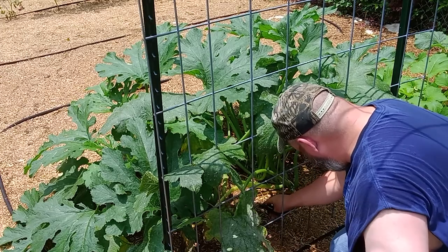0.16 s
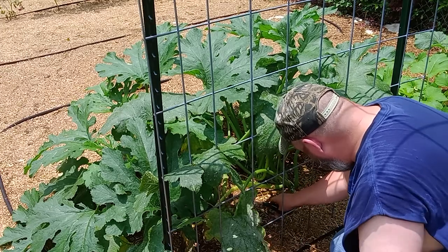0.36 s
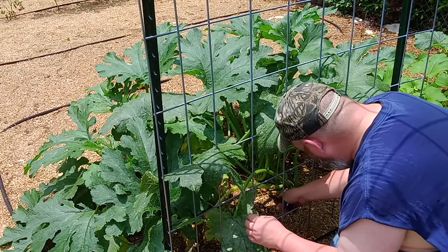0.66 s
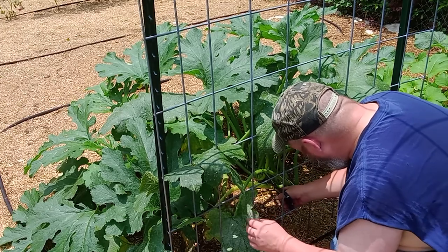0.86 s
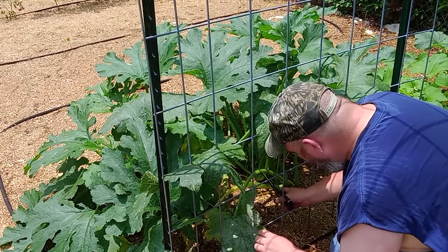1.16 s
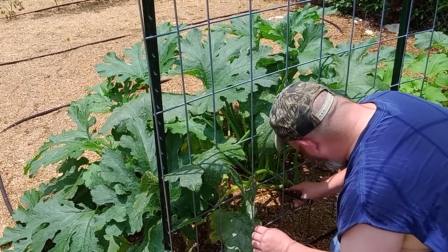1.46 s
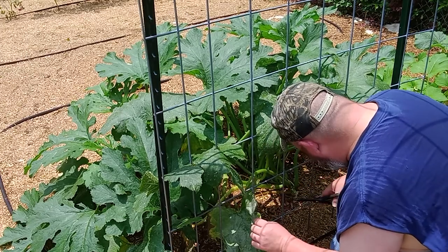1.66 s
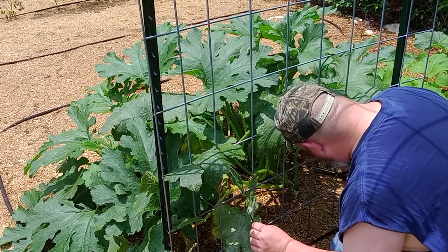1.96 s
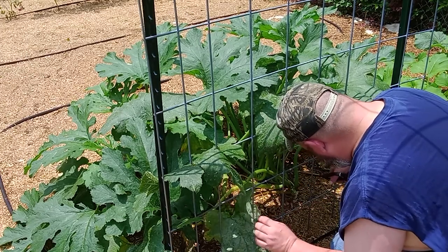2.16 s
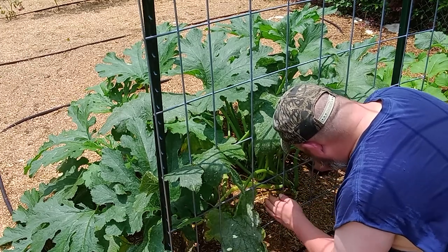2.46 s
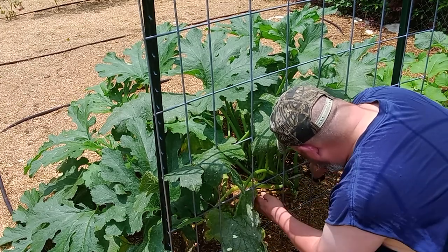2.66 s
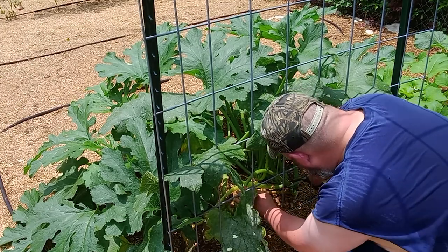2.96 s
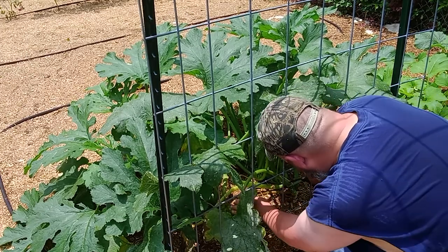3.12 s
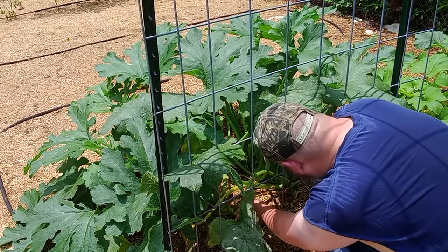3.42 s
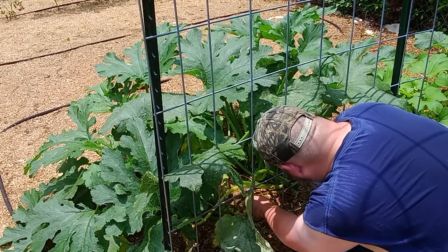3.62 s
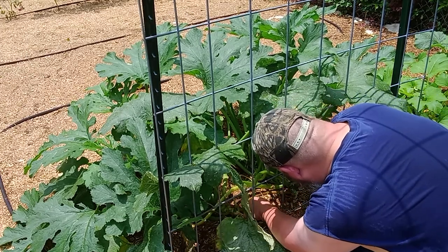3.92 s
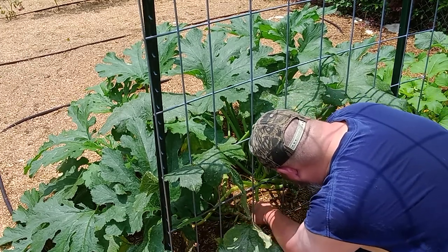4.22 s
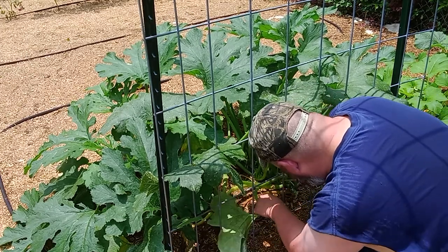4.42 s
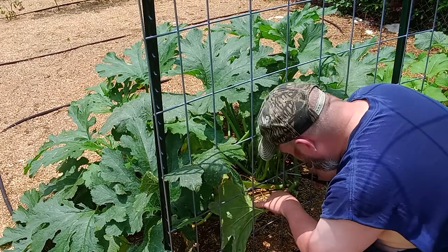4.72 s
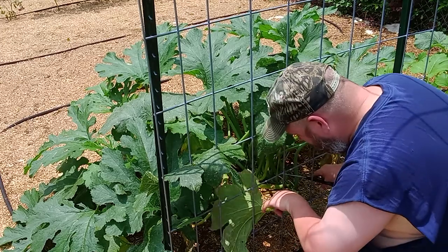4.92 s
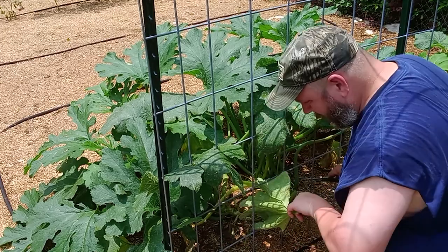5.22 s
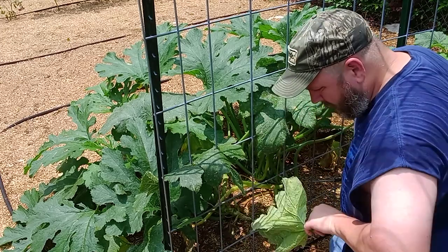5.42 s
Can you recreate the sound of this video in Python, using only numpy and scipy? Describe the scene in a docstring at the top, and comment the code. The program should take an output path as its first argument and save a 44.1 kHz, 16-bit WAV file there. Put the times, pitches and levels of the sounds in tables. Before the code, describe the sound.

Close outdoor stereo pickup in a garden with slight wind on the microphone. Leaves rustle and blades nip softly at first, then shear hard around 1.6 seconds. A cicada pulses in a raspy buzz that dies out by about 3.5 seconds. Small birds twitter and whistle. A hollow stalk cracks at 4.4 seconds, then a bristly leaf is dragged out, over constant low traffic and machine hum.

```python
"""First a hand stirs a squash plant and the blades nip, over a cicada that pulses until it runs down, while a gust fades.
At 1.6 s the hand pruners shear hard; small birds twitter at 2.1 s and 3.6 s, and others whistle from 3.8 s on.
At 4.4 s a hollow stalk cracks, and around 5 s the bristly leaf is dragged out; far traffic and a machine hum throughout.
Cuts and leaves are tiny random snaps sent through resonances and colours; cicada, birds and hum are gliding tones.
Traffic, wind and air are shaped noise."""
import sys
import numpy as np
from scipy import signal
from scipy.fft import rfft, irfft, next_fast_len
from scipy.io import wavfile
from scipy.ndimage import uniform_filter1d

SR = 44100
rng = np.random.default_rng(int(sys.argv[2]) if len(sys.argv) > 2 else 0)


def transcribe(u):
    """Save the signal u as a 16-bit wav file named by the first command-line argument.

    u: samples, shape (n,) or (channels, n), limited to [-1, 1]; the rate is SR.
    q: integer samples, one column per channel.
    """
    v = np.clip(np.atleast_2d(u).T, -1, 1)
    q = np.round(v * 32767).astype(np.int16)
    wavfile.write(sys.argv[1], SR, q)


N = 246059
TIME = np.arange(N) / SR  # seconds

# Levels in the tables are relative: later mixing steps may shift them.
# Blades biting and stalks giving way. Each row: start in seconds, level in dB,
# fade time in seconds, ring of the hollow stalk in dB against the tearing.
CUTS = [(0.043, -72, 0.0061, 7), (0.174, -57, .003, 3), (0.214, -54.5, 0.019, -9), (.277, -62, .005, 12),
        (.319, -59.5, 0.008, 13), (1.569, -54, 0.021, -26), (1.6363, -42, 0.0033, -23),
        (1.641, -47, 0.0089, -32), (1.6535, -53, 0.005, -26), (1.6656, -51, 0.0076, -18),
        (1.682, -53.5, 0.012, -16), (2.165, -53.5, 0.0049, -16), (2.2902, -58, .003, -8),
        (3.019, -61, .004, -12), (3.3019, -61, .009, -8), (3.566, -59, .004, -13),
        (3.9405, -58, 0.0016, -12), (3.9925, -67, .003, -4), (4.0745, -61, 0.015, 6),
        (4.1155, -43, 0.0033, -8), (4.1188, -56, .001, -5), (4.1199, -52, 0.002, -11),
        (4.2138, -62, .003, -8), (4.3637, -51.5, 0.003, 6), (4.379, -42.5, 0.0007, 7.5),
        (4.3806, -42, .0027, 6.5), (4.3862, -46, .001, -3), (4.8, -57, 0.0033, -5), (4.825, -65, 0.0036, 2),
        (4.8663, -77, 0.0036, -10), (5.3433, -62, 0.0025, -14)]
# Resonances of the hollow stalk. Each row: pitch in Hz, width in Hz, level in dB.
STALK_MODES = [(960, 230, 9.5), (1760, 110, 8), (1900, 180, 3), (2550, 160, -18), (3270, 130, 2),
               (4300, 290, 11), (5200, 250, 10), (6240, 330, -7), (10800, 480, -2), (13000, 400, -3)]
# The stem jolts as it is cut. Each row: pitch in Hz, width in Hz, level in dB.
JOLT_MODES = [(337, 58, 11), (524, 190, 4), (714, 47, -5)]
# Bright resonances that ring with each cut. Each row: pitch in Hz, width in Hz, level in dB.
BRIGHT_MODES = [(5570, 140, -14), (7760, 240, 7), (9500, 220, 2), (13500, 490, -1)]
# Colour of tearing fibres. Each row: frequency in Hz, level in dB.
TEARING_COLOUR = [(500, 7), (1500, -8), (3000, 2.5), (4200, -0.5), (6000, 7.5), (8500, -1.5), (11000, -3),
                  (13500, -6), (16000, -6)]
TEAR_SHARE = 0.99  # fibres tear at full strength for this share of the fade time
SNAP_ONSET_DB, KNOCK_DB = 16, 24  # first crack of a cut, and its knock on the stalk, above the tearing
CUT_PAN_DB = 1  # louder on the left
REFLECTION_S, REFLECTION_DB = .019, -14  # a nearby surface throws each cut back
ECHO_TOP_HZ = 6000  # foliage soaks up the treble of the echoes

# A hand moves through the plant. Each row: time of the height in seconds, rise time in seconds,
# level of bristles in dB, of bending leaf in dB, of rubbing stalks in dB.
STROKES = [(0.063, 0.055, -52.5, -52, -72), (.3, 0.24, -68, -57, -74), (1.665, 0.05, -56, -57, -49),
           (1.72, 0.42, -60.5, -63.5, -71), (1.93, 0.026, -57, -75, -72), (2.22, 0.29, -58, -60.5, -72),
           (3.05, 0.38, -65.5, -68, -65), (3.35, 0.072, -61.5, -61, -66), (3.68, 0.12, -59.5, -67, -58),
           (4.1, 0.21, -54, -65, -57.5), (4.405, 0.039, -63, -53.5, -52), (4.62, 0.27, -71, -61, -62),
           (4.8, 0.12, -58, -57, -57.5), (4.95, 0.047, -54.5, -55, -51), (5.03, 0.13, -51.5, -64, -55),
           (5.11, 0.051, -59, -53.5, -54), (5.19, 0.19, -47.5, -61, -72), (5.52, 0.38, -68, -65, -62.5)]
# Colour of scratching bristles. Each row: frequency in Hz, level in dB.
LEAF_COLOUR = [(400, -37), (1000, 1.5), (2700, -0.5), (4500, 0), (6300, -5.5), (7600, 4.5), (8800, -1.5),
               (11500, 0.5), (15500, -2)]
# A leaf flaps, or ticks against its neighbours. Each row: start in seconds, pitch in Hz, level in dB.
TAPS = [(3.243, 11500, -57), (3.346, 9250, -58), (3.368, 10000, -61), (3.43, 13000, -57),
        (4.829, 1900, -58), (5.087, 900, -44), (5.108, 1700, -47), (5.117, 1300, -46), (5.146, 900, -44),
        (5.17, 1000, -45), (5.186, 10000, -48), (5.218, 11500, -47), (5.266, 1200, -50), (5.445, 5000, -47),
        (5.488, 9000, -47.5), (5.55, 8500, -54), (5.567, 9000, -60)]
TAP_FADE_S, TAP_WIDTH = .003, 0.41  # how fast a tap dies; its bandwidth as a share of its pitch
FALL_SHARE = 0.77  # a stroke dies away in this share of its rise time
STIR_DB = -73.5  # the leaves never lie quite still
SNAPS_PER_S, SNAP_DB = 25, -11  # small fibres break at random; level against the bristles
BRISTLE_SURGE_DB, BRISTLE_PATCH_DB = 0.9, 2.0  # typical swing of the whole scratch, and of each band

# The cicada's count of pulses. Each row: time in seconds, pulses sung so far.
PULSES = [(-.021, 0), (.453, 6), (.993, 13), (1.658, 22), (2.526, 34), (2.906, 39), (3.388, 45), (5.58, 71)]
# The cicada's effort. Each row: time in seconds, level in dB.
EFFORT = [(0, -50.5), (1, -48.5), (2.1, -48), (2.45, -52.5), (2.7, -51.5), (2.88, -55), (3.38, -56.5),
          (3.5, -68), (3.8, -82), (5.58, -130)]
# One pulse of its abdomen. Each row: share of the cycle, depth of the pitch dip from 0 to 1, level in dB.
PULSE_SHAPE = [(0, .06, 4), (.14, .4, 5.5), (.3, .75, -1), (.52, 1, -2), (.72, .64, -1.5), (.86, .25, -9),
               (.93, 0, -1)]
# The dip gets shallower as the song goes on. Each row: time in seconds, lowest pitch in Hz before the waver.
DIP = [(0, 3860), (.6, 3990), (1.0, 4300), (2.1, 4466), (3.4, 4570)]
# Resonances that slide together in each pulse. Each row: multiple of the main pitch, level in dB.
SLIDING_MODES = [(.69, -14), (1, -3), (1.272, -17)]
# Fixed resonances of its body. Each row: pitch in Hz, width in Hz, level in dB.
BODY_MODES = [(3750, 40, -4), (3980, 40, -5), (4255, 40, -7), (4400, 60, -4), (4620, 50, -3),
              (5210, 45, -2), (5395, 30, -4), (5540, 25, -5), (5950, 50, -1), (6750, 90, -2)]
# Colour of the scattered song. Each row: frequency in Hz, level in dB.
HISS_COLOUR = [(2100, -36), (2800, -3.5), (3700, -0.5), (4500, 0), (5700, 3.5), (6700, -4.5), (7600, -7),
               (8400, -15), (10500, -17), (12700, -11), (15500, -28)]
# The scattered song, whose bright part leads each pulse. Each row: low edge in Hz, high edge in Hz,
# share of the cycle at its height, swing in dB at the start.
SCATTER_BANDS = [(1000, 4300, 0.47, 2.0), (4300, 5300, 0.17, 1), (5310, 20000, 0.13, 1)]
TOP_HZ = 6050  # the pitch where there is no dip, before the waver
TYMBAL_HZ, TYMBAL_WAVER, TYMBAL_RING_S = 372, .03, .0011  # mean buckling rate, typical waver as a share, ring
BUZZ_ROUGH = .45  # how much noise is mixed into the buzz
FLUTTER_PER_S, FLUTTER_DB = 110, 1.4  # the song breaks into uneven grains
CLARITY_LOSS = .5  # dB that the clear song sinks into the hiss per dB of lost effort
SONG_DB, SONG_ECHO_DB, SONG_HISS_DB = -5, -12, -3.8  # heard directly, echoed and scattered
SWING_GROWTH_PER_S = .22  # the gaps between pulses deepen as the song goes on

# A bird twitters twice, note by note. Each row: start in seconds, length in seconds, pitch in Hz,
# sweep in Hz, arch in Hz, level in dB.
TWITTERS = [(2.102, 0.019, 4000, -950, 298, -46), (2.127, 0.011, 3860, -1000, 250, -41),
            (2.143, 0.0077, 3930, -200, 0, -46), (2.161, 0.027, 3800, 250, 420, -43),
            (2.195, 0.015, 3590, -500, 0, -49), (3.567, .018, 3550, 1900, -450, -62),
            (3.589, .012, 4600, -600, 0, -61), (3.596, 0.019, 3950, -700, 100, -52.5),
            (3.615, 0.012, 3790, 700, 0, -51), (3.627, 0.012, 3760, 600, 0, -49),
            (3.636, 0.026, 3890, -200, 90, -53.5), (3.663, 0.011, 3590, 500, 0, -51),
            (3.677, 0.016, 3574, -300, 30, -51.5), (3.693, 0.017, 3590, -150, 0, -57),
            (3.732, .018, 3900, -150, 0, -69), (3.83, 0.0205, 3850, 400, 0, -67),
            (3.885, .024, 3820, -300, 0, -69), (3.99, .018, 3900, -150, 0, -64)]
# Other birds whistle single notes. Each row: start in seconds, length in seconds, pitch in Hz,
# sweep in Hz, level in dB.
WHISTLES = [(3.842, 0.045, 4564, -23, -50.5), (3.997, 0.04, 3175, -42, -61), (4.19, 0.14, 3860, -120, -67),
            (5.007, 0.072, 4570, -150, -50.5), (5.371, 0.068, 3760, -260, -62)]
TWITTER_PAN_DB, WHISTLE_PAN_DB = -1.5, 3  # above 0: louder on the left
TWITTER_ECHO_DB, WHISTLE_ECHO_DB = -4, -8  # scattered by the surroundings
TWIG_ECHO_DB = -5  # the twigs right around the bird blur each note
WHISTLE_ARCH_HZ = 29.8
FAR_ECHO_S, FAR_ECHO_DB, FAR_ECHO_T60_S = .05, -9, .7  # thrown back by far trees

# Machine hum. Each row: mean pitch in Hz, level in dB.
HUM = [(59.5, -42.5), (80.5, -39), (120, -44), (237, -56.5)]
# Colour of the far traffic. Each row: frequency in Hz, level in dB.
RUMBLE_COLOUR = [(15, -38), (25, -54), (46, -3), (65, 0.5), (81, 1), (124, -3.5), (199, -17), (243, -16),
                 (270, -30.5), (348, -23), (400, -47), (520, -84), (880, -120)]
# Level of the far rumble. Each row: time in seconds, level in dB.
TRAFFIC = [(0, -34), (.37, -30.5), (.55, -35), (.66, -30.5), (1.35, -30), (1.48, -34.5), (2.0, -33.5),
           (3.15, -34.5), (4.5, -33.5), (4.78, -35), (5.14, -29.5), (5.3, -33.5), (5.58, -31)]
# A gust on the microphones. Each row: time in seconds, share of the bass power that is wind, from 0 to 1.
GUST = [(0, 0.44), (.38, 0.66), (.55, 0.45), (1.05, 0.35), (1.35, 0.02), (5.58, 0)]
# Colour of the wind. Each row: frequency in Hz, level in dB.
WIND_COLOUR = [(28, -34), (45, -36), (70, -6.5), (105, -15.5), (150, -26), (260, -37)]
# Wash of outdoor air. Each row: time in seconds, level in dB.
BREEZE = [(0, -46), (1.0, -49.5), (3.0, -49.5), (5.58, -50)]
# Colour of the outdoor air. Each row: frequency in Hz, level in dB.
AIR_COLOUR = [(250, 8), (400, -0.5), (650, -1), (1000, -5), (1600, -12.5), (2400, -20), (4500, -24),
              (6500, -26), (8800, -28.5), (12500, -29), (16000, -56)]
RUMBLE_PAN_DB = -1.1  # louder on the right

# Left-right likeness of sound from all around. Each row: frequency in Hz, correlation from -1 to 1.
LIKENESS = [(40, 0.67), (80, 1), (130, 0.95), (260, 0.85), (550, 0.45), (1000, -0.37), (4000, 0.084),
            (15000, -0.32)]
# Colour of the microphone ports. Each row: frequency in Hz, level in dB.
MICROPHONE = [(6500, 0.5), (7700, 0), (8500, -1), (9700, 0.5), (11000, 0.5), (13000, 2), (15500, 2)]
CUTOFF_HZ = 15900


def pruners():
    """Each cut snaps, knocks the hollow stalk into ringing and tears fibres, which also jolt the stem."""
    fibres = crackle(per_s=12000, spread_db=2.2)
    tear, knock = np.zeros((2, N)), np.zeros((2, N))
    for s, db, fade_s, ring_db in CUTS:
        at = int(s * SR)
        t = TIME[:min(SR // 4, N - at)]
        here = slice(at, at + len(t))
        snap = place(1.0 * (t == 0), count=3)
        burst = fibres[:, here] * np.exp(-np.clip(t / fade_s - TEAR_SHARE, 0, 20))
        tear[:, here] += from_db(db) * (burst + from_db(SNAP_ONSET_DB) * snap)
        knock[:, here] += from_db(db + ring_db) * (burst + from_db(KNOCK_DB) * snap)
    stalk = 0
    for k, (hz, width_hz, db) in enumerate(STALK_MODES):
        stalk = stalk + (-1) ** k * from_db(db) * resonate(knock, hz, width_hz)  # neighbours alternate in sign
    jolt = ring_modes(tear + knock, JOLT_MODES)
    bright = ring_modes(tear, BRIGHT_MODES)
    cut = from_db(5.0) * colour(tear, TEARING_COLOUR) + stalk + bright + from_db(-3.0) * jolt
    foliage = signal.butter(2, ECHO_TOP_HZ, fs=SR, output="sos")
    echoes = signal.sosfilt(foliage, garden(cut, t60=0.17))
    late_cut = np.roll(cut, int(REFLECTION_S * SR), axis=1)
    reflection = from_db(REFLECTION_DB) * resonate(late_cut, hz=4700, width_hz=1500)
    return panned(cut, CUT_PAN_DB) + reflection + from_db(-10.0) * echoes


def leaves():
    """Bristles scratch in clumps, broad blades rustle as they bend, stalks rasp and small fibres snap."""
    scratching = colour(crackle(per_s=2000, spread_db=2.2), LEAF_COLOUR)
    # The colour of the scratch shifts from leaf to leaf: each band drifts by itself.
    edges = np.geomspace(400, 16000, 13)
    bristles = 0
    for low, high in zip(edges, edges[1:]):
        bristles = bristles + band(scratching, low, high) * from_db(BRISTLE_PATCH_DB * drift(11))
    bristles = rms_one(bristles) * from_db(BRISTLE_SURGE_DB * drift(29))

    bending = resonate(crackle(per_s=700, spread_db=2.6), hz=1940, width_hz=1950)
    blades = rms_one(bending) * from_db(3.5 * drift(30))

    rubbing = crackle(per_s=750, spread_db=2.2)
    rasp = rms_one(resonate(resonate(rubbing, hz=3950, width_hz=2500), hz=4070, width_hz=2600))

    starts = rng.random(N) < SNAPS_PER_S / SR
    breaks = signal.lfilter([1], [1, -np.exp(-1 / (0.024 * SR))], starts + 1e-18)  # each fades over 24 ms
    snaps = rms_one(colour(breaks * rng.standard_normal((2, N)), TEARING_COLOUR))

    power = sum((from_db(dbs)[:, None] * swell(s, rise_s)) ** 2 for s, rise_s, *dbs in STROKES)
    brush, bend, rub = np.sqrt(power)
    scratch = np.hypot(brush, from_db(STIR_DB)) * (bristles + from_db(SNAP_DB) * snaps)
    rustle = scratch * from_db([[.9], [-.9]]) + bend * blades + rub * rasp + taps()
    return from_db(-0.5) * rustle


def taps():
    """Each tap is a brief cluster of snaps: dull for a broad leaf, bright for a dry edge."""
    snaps, out = crackle(per_s=6000, spread_db=1.5), np.zeros((2, N))
    for s, hz, db in TAPS:
        at = int(s * SR)
        t = TIME[:min(SR // 10, N - at)]
        width_hz = TAP_WIDTH * hz
        burst = resonate(snaps[:, at:at + len(t)] * np.exp(-t / TAP_FADE_S), hz, width_hz)
        # A narrow resonance lets less through, so it is made up here.
        out[:, at:at + len(t)] += from_db(db) * burst * np.sqrt(SR / (np.pi * width_hz))
    return out


def swell(s, rise_s):
    """A movement builds up to its height at s and dies away faster."""
    return np.exp(-np.maximum((s - TIME) / rise_s, (TIME - s) / (FALL_SHARE * rise_s)) ** 1.25)


def cicada():
    """Tymbal clicks ring an abdomen whose pitch dips in every pulse; the trees smear part into a hiss."""
    cycle = np.interp(TIME, *np.transpose(PULSES))
    share, depth, db = np.transpose(PULSE_SHAPE)
    dip_hz = TOP_HZ - np.interp(TIME, *np.transpose(DIP))
    pitch = TOP_HZ - dip_hz * np.interp(cycle, share, depth, period=1)
    pitch = pitch * (1 + 0.0072 * drift(30.8))

    # The tymbals buckle at a nearly steady rate.
    clicks_so_far = np.cumsum(TYMBAL_HZ * (1 + TYMBAL_WAVER * drift(9.4))) / SR
    since_click_s = clicks_so_far % 1 / TYMBAL_HZ
    clicks = uniform_filter1d(np.exp(-since_click_s / TYMBAL_RING_S), size=16)
    force = from_db(np.interp(cycle, share, db, period=1)) * rms_one(clicks)

    damping = signal.butter(2, 90, fs=SR, output="sos")
    song = 0
    for multiple, mode_db in SLIDING_MODES:
        grit = rms_one(signal.sosfilt(damping, rng.standard_normal(N)))
        buzz = 1 - BUZZ_ROUGH + BUZZ_ROUGH * grit
        buzz /= np.sqrt(uniform_filter1d(buzz ** 2, size=500) + 1e-9)  # the muscle pulls evenly
        tone = np.sqrt(2) * np.sin(2 * np.pi * multiple * np.cumsum(pitch) / SR)
        song += from_db(mode_db) * force * buzz * tone
    song = place(song * rms_one(from_db(FLUTTER_DB * drift(FLUTTER_PER_S))), count=10)
    effort = level(EFFORT)
    song = song * (effort / effort.max()) ** CLARITY_LOSS

    scattered = diffuse(HISS_COLOUR) * from_db(1.6 * drift(34))
    deepening = 1 + SWING_GROWTH_PER_S * TIME
    hiss = 0
    for low, high, height, swing_db in SCATTER_BANDS:
        swing = deepening * swing_db * np.cos(2 * np.pi * (cycle - height))
        hiss = hiss + band(scattered, low, high) * from_db(swing)

    echo = garden(song, t60=0.14)
    song = from_db(SONG_DB) * song + from_db(SONG_ECHO_DB) * echo + from_db(SONG_HISS_DB) * hiss
    body = ring_modes(song, BODY_MODES)
    return effort * (from_db(1.0) * song + from_db(5.0) * body) * from_db([[.4], [-.4]])


def birds():
    """Twitters are quick, uneven sweeps blurred by twigs; whistles sag a little. Far trees return both."""
    twitter = panned(sum(note(*row) for row in TWITTERS), TWITTER_PAN_DB)
    twitter = twitter + from_db(TWIG_ECHO_DB) * garden(twitter, t60=0.077)
    whistle = 0
    for s, length_s, hz, sweep_hz, db in WHISTLES:
        whistle = whistle + note(s, length_s, hz, sweep_hz, WHISTLE_ARCH_HZ, db)
    whistle = panned(whistle, WHISTLE_PAN_DB)
    near = garden(from_db(TWITTER_ECHO_DB) * twitter + from_db(WHISTLE_ECHO_DB) * whistle, t60=0.29)
    late = np.roll(twitter + whistle, int(FAR_ECHO_S * SR), axis=1)
    far = from_db(FAR_ECHO_DB) * garden(late, t60=FAR_ECHO_T60_S)
    return twitter + whistle + near + far


def note(s, length_s, hz, sweep_hz, arch_hz, db):
    """One pure bird note: it sweeps through its pitch, and a positive arch makes both ends droop."""
    u = np.linspace(-1, 1, int(length_s * SR))  # from the start to the end of the note
    pitch = hz + sweep_hz * u / 2 - arch_hz * u ** 2
    tone = np.sin(2 * np.pi * np.cumsum(pitch) / SR) * signal.windows.tukey(len(u), .5)
    return from_db(db) * np.pad(tone, (int(s * SR), N))[:N]


def distance():
    """Far traffic, a wavering machine hum and a wash of air; a gust buffets each microphone on its own."""
    hum = 0
    for hz, db in HUM:
        pitch = hz * (1 + 0.01138 * drift(5.36))
        tone = np.sqrt(2) * np.sin(2 * np.pi * np.cumsum(pitch) / SR)
        hum = hum + from_db(db + 2 * drift(3.3)) * tone
    far = panned(rms_one(from_db(-34.0) * diffuse(RUMBLE_COLOUR) + hum), RUMBLE_PAN_DB)
    wind = rms_one(colour(rng.standard_normal((2, N)), WIND_COLOUR)) * from_db([[1.3], [-1.3]])
    share = np.clip(np.interp(TIME, *np.transpose(GUST)), 0, 1)
    low = np.sqrt(1 - share) * far + np.sqrt(share) * wind
    low /= np.sqrt(uniform_filter1d(np.mean(low, axis=0) ** 2, size=6500))  # the rumble rolls evenly
    highpass = signal.butter(2, 34, "high", fs=SR, output="sos")
    low = signal.sosfilt(highpass, level(TRAFFIC) * low)
    return from_db(0.6) * low + level(BREEZE) * diffuse(AIR_COLOUR)


def diffuse(spectrum):
    """Sound from all around: the table of likeness sets how alike both microphones hear it."""
    alike = np.clip(per_bin(LIKENESS), -1, 1)
    mid, side = rfft(rng.standard_normal((2, N)))
    pair = np.sqrt(1 + alike) * mid + np.sqrt(1 - alike) * side * [[1], [-1]]
    return rms_one(colour(irfft(pair, N), spectrum))


def garden(x, t60):
    """Scattered echoes from trees, fence and ground, which fall by 60 dB in t60 seconds."""
    t = TIME[:SR // 2]
    echoes = rng.standard_normal((2, len(t))) * from_db(-60 * t / t60) * (t > .004)
    echoes /= np.sqrt(np.sum(echoes ** 2, axis=1, keepdims=True))
    return signal.fftconvolve(x, echoes, axes=1)[:, :N]


def crackle(per_s, spread_db):
    """Snaps in the plant, heard directly and scattered by the leaves around."""
    scattered = np.array([grains(per_s, spread_db), grains(per_s, spread_db)])
    return rms_one(place(grains(per_s, spread_db), count=4) + scattered)


def grains(per_s, spread_db):
    """Tiny random snaps of uneven size."""
    sizes = from_db(spread_db * np.minimum(rng.exponential(1, N), 4)) * rng.choice([-1, 1], N)
    return rms_one(sizes * (rng.random(N) < per_s / SR))


def resonate(x, hz, width_hz):
    """One resonance with a gain of about 1 on top."""
    r = np.exp(-np.pi * width_hz / SR)
    top = np.array([1, 0, -1]) * (1 - r * r) / 2
    return signal.lfilter(top, [1, -2 * r * np.cos(2 * np.pi * hz / SR), r * r], x + 1e-18)


def ring_modes(x, modes):
    """Several resonances ring at once."""
    return sum(from_db(db) * resonate(x, hz, width_hz) for hz, width_hz, db in modes)


def place(x, count):
    """A source to one side reaches the right microphone count samples later."""
    return np.array([x, np.roll(x, count)])


def panned(x, pan_db):
    """Louder on the left by pan_db."""
    return x * from_db(np.array([[pan_db], [-pan_db]]) / 2)


def drift(rate):
    """Smooth chance with spread 1: noise whose changes faster than rate, in Hz, are damped."""
    r = np.exp(-80 * np.pi * rate / SR)  # worked out at every 40th sample
    slow = signal.lfilter([1], [1, -2 * r, r * r], rng.standard_normal(N // 40 + 2002))[2000:]
    return np.interp(np.arange(N) / 40, np.arange(len(slow)), rms_one(slow))


def colour(x, spectrum):
    """Give x a spectrum that falls away steeply outside the table."""
    skirts = [(spectrum[0][0] / 2, -70), *spectrum, (spectrum[-1][0] * 2, -70)]
    return irfft(rfft(x) * from_db(per_bin(skirts)), N)


def band(x, low_hz, high_hz):
    """The part of x between two frequencies."""
    size = next_fast_len(N, real=True)
    hz = np.arange(size // 2 + 1) * SR / size
    return irfft(rfft(x, size) * ((hz >= low_hz) & (hz < high_hz)), size)[..., :N]


def per_bin(points):
    """A (Hz, value) table read at every frequency of the spectrum."""
    hz, value = np.transpose(points)
    return np.interp(np.log(np.arange(N // 2 + 1) * SR / N + 1e-3), np.log(hz), value)


def level(rows):
    """A (seconds, dB) curve as a gain at every sample."""
    return from_db(np.interp(TIME, *np.transpose(rows)))


def rms_one(x):
    """Scale to unit power."""
    return x / np.sqrt(np.mean(x ** 2) + 1e-20)


def from_db(db):
    """Decibels to gain."""
    return 10 ** (np.asarray(db) / 20)


def scene():
    """The work in the plant, with the garden around it."""
    return pruners() + leaves() + cicada() + birds() + distance()


def record(dry):
    """The microphone ports colour the treble, and the top is cut steeply."""
    coloured = irfft(rfft(dry) * from_db(per_bin(MICROPHONE)), N)
    return signal.sosfilt(signal.ellip(12, .1, 80, CUTOFF_HZ, fs=SR, output="sos"), coloured)


dry = scene()
out = record(dry)
transcribe(out)
```